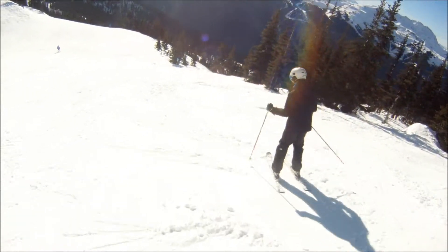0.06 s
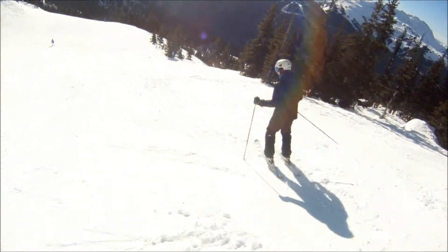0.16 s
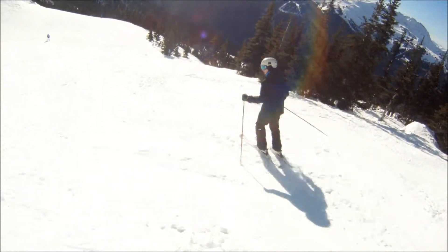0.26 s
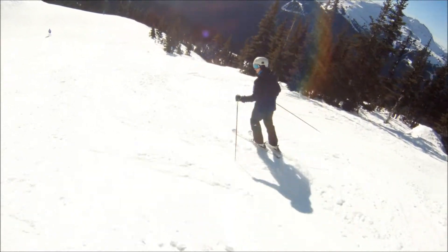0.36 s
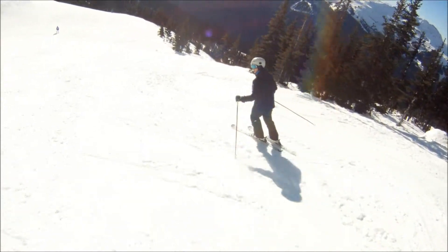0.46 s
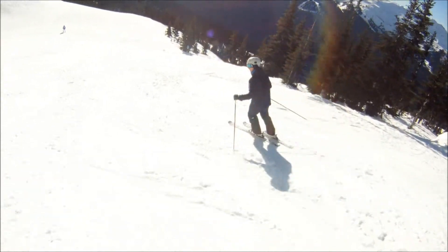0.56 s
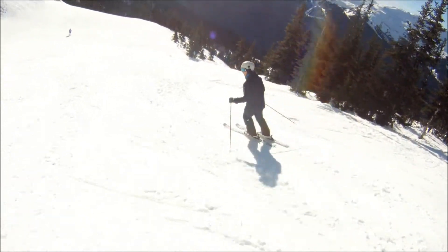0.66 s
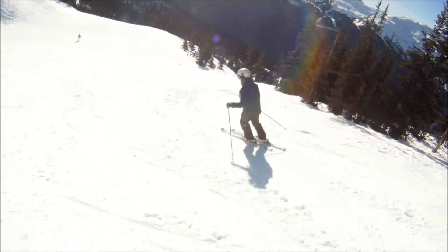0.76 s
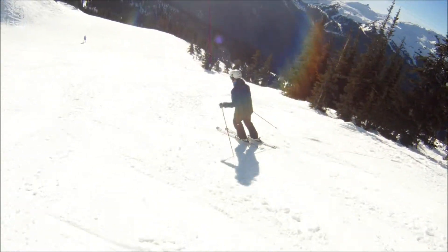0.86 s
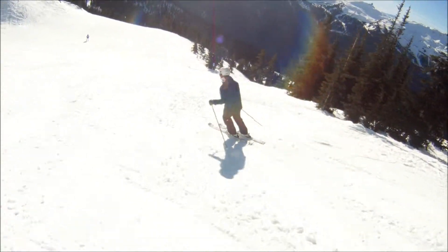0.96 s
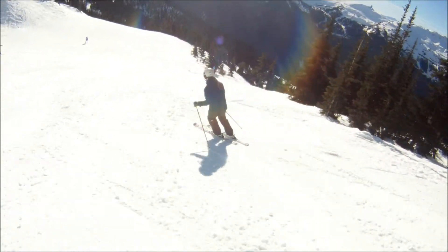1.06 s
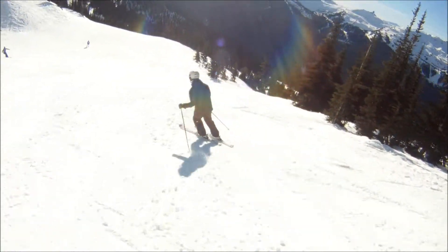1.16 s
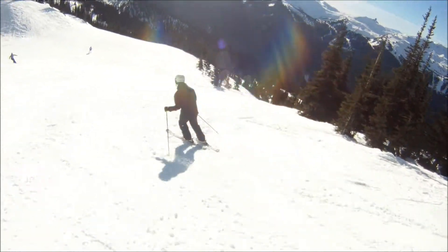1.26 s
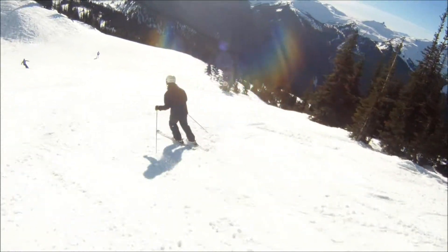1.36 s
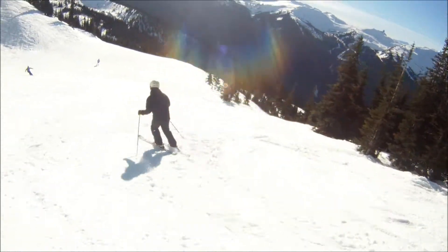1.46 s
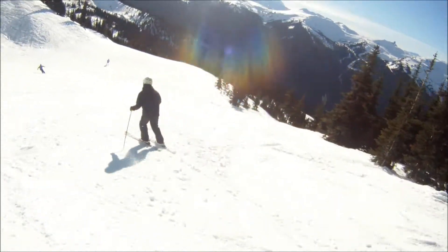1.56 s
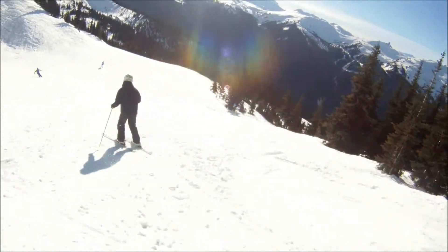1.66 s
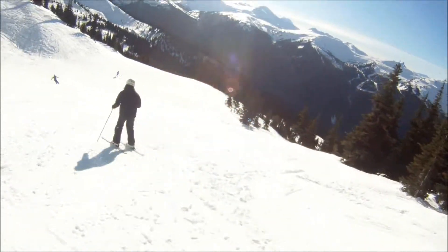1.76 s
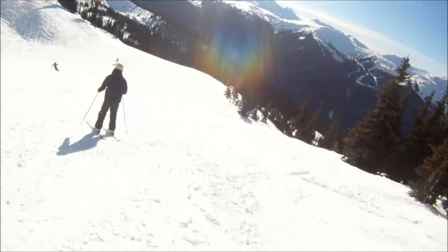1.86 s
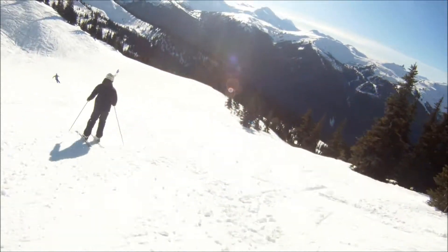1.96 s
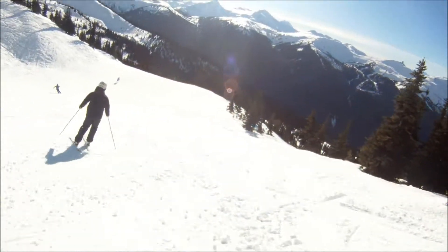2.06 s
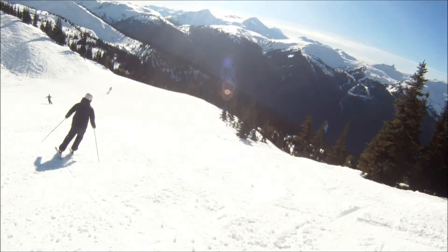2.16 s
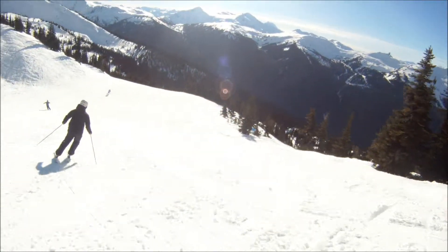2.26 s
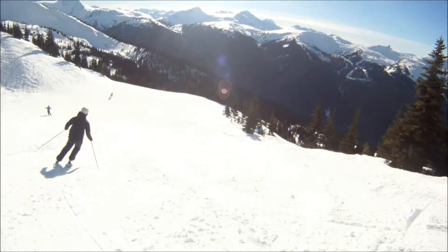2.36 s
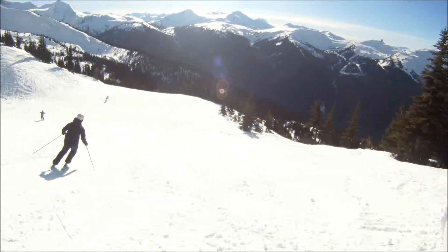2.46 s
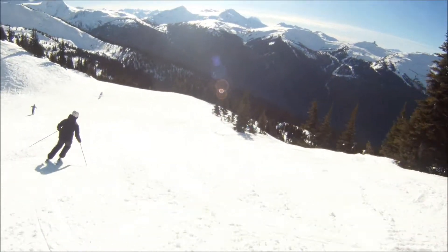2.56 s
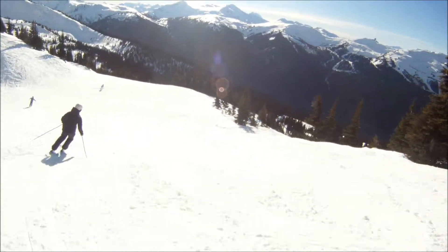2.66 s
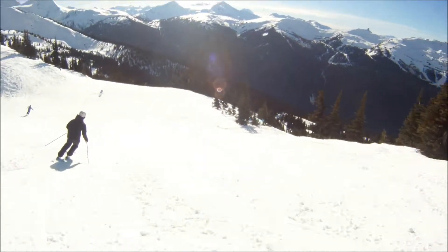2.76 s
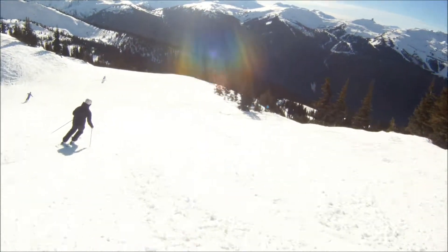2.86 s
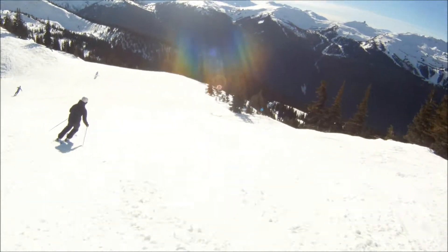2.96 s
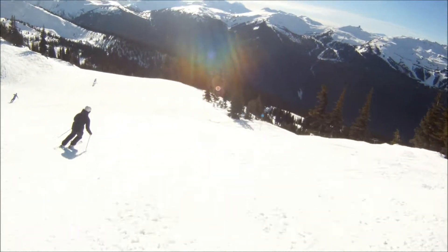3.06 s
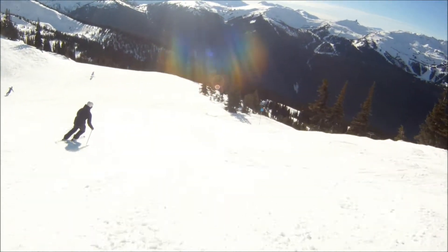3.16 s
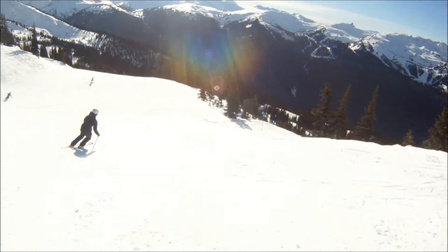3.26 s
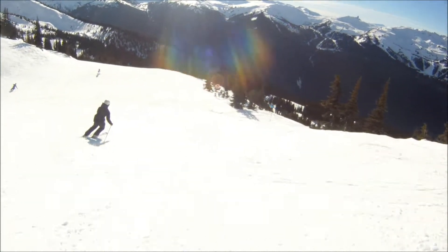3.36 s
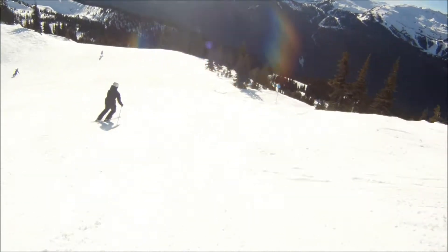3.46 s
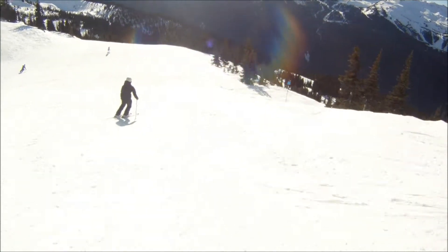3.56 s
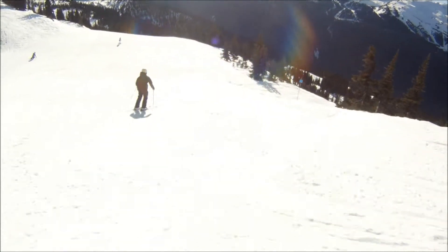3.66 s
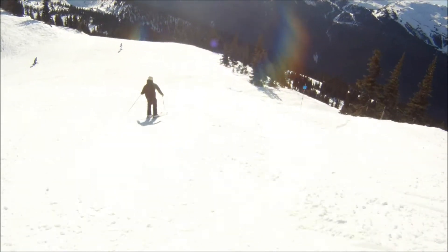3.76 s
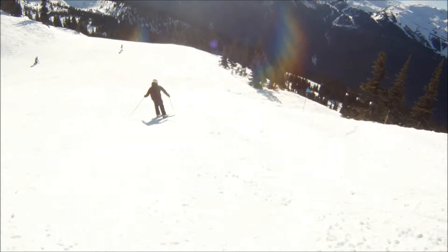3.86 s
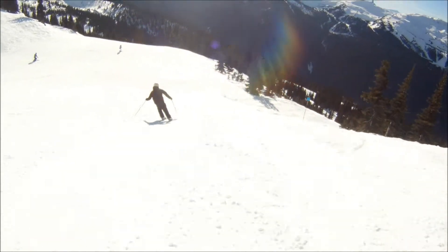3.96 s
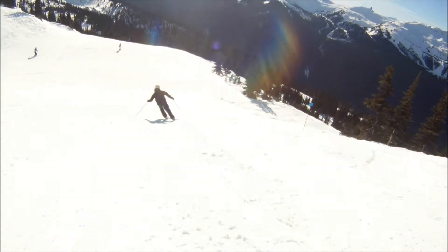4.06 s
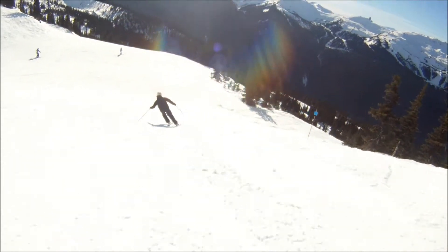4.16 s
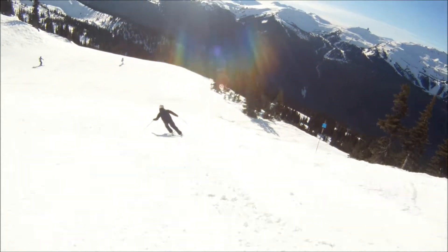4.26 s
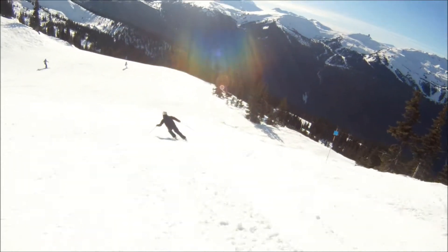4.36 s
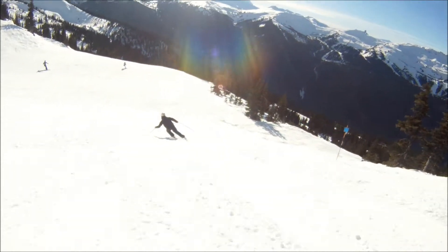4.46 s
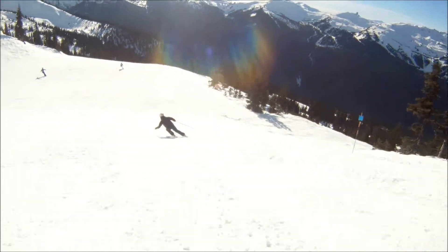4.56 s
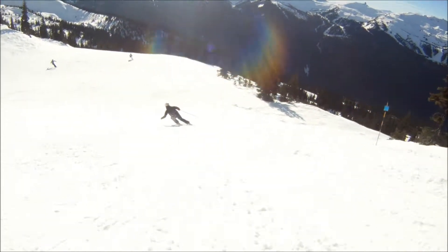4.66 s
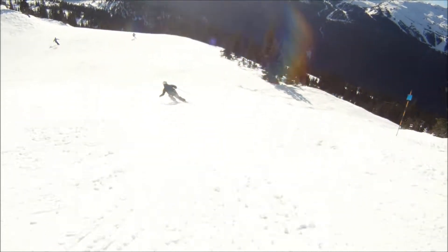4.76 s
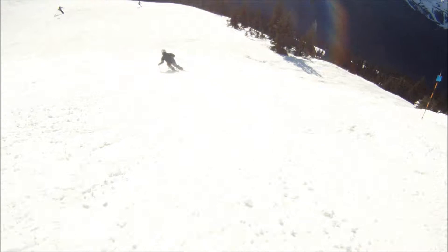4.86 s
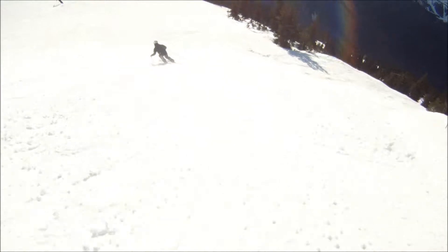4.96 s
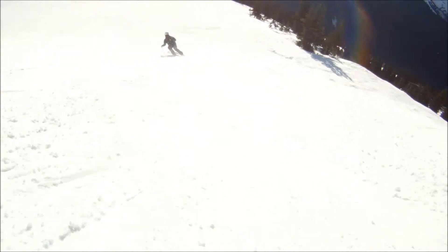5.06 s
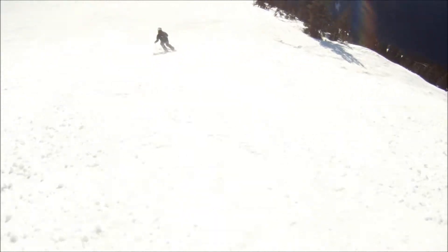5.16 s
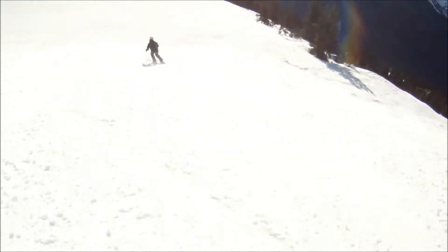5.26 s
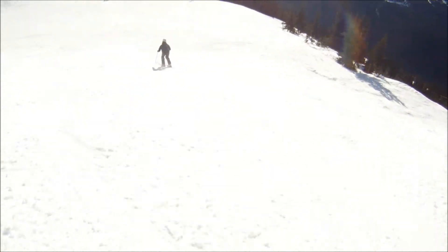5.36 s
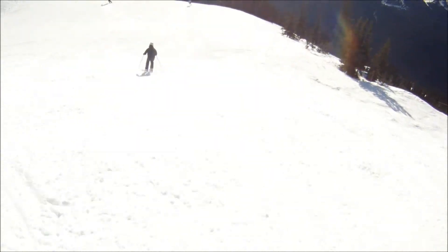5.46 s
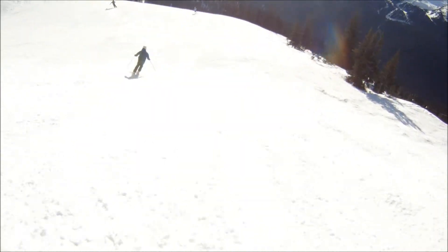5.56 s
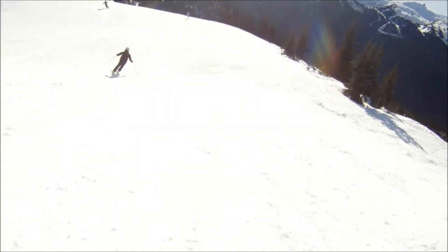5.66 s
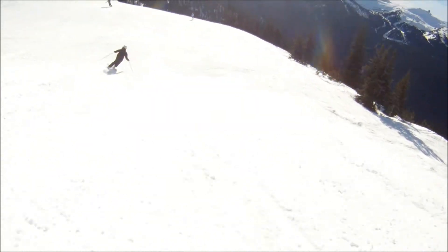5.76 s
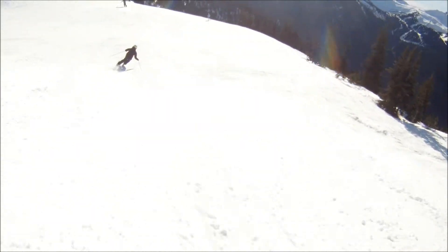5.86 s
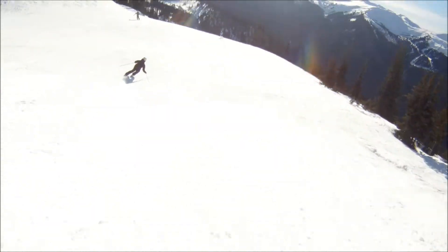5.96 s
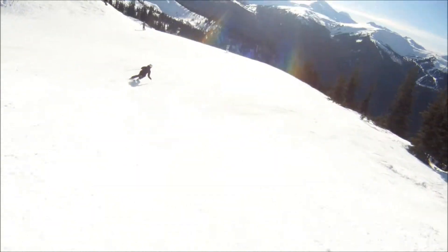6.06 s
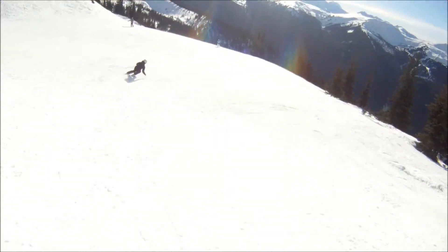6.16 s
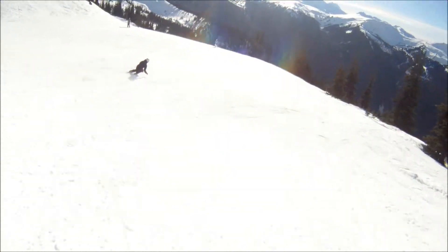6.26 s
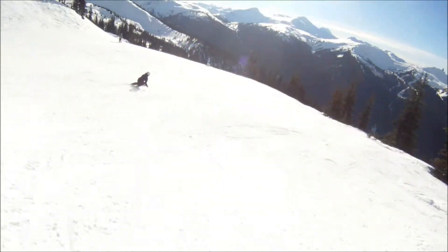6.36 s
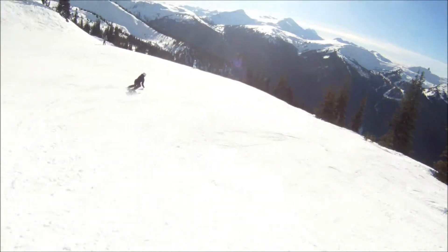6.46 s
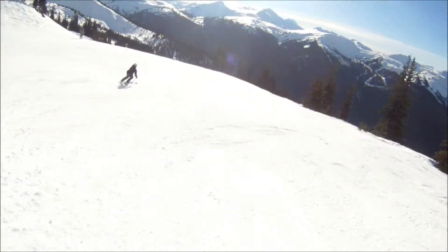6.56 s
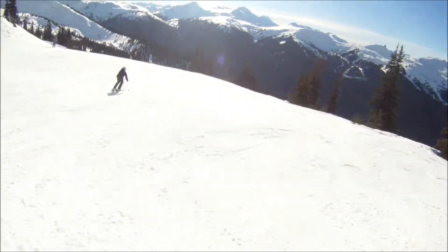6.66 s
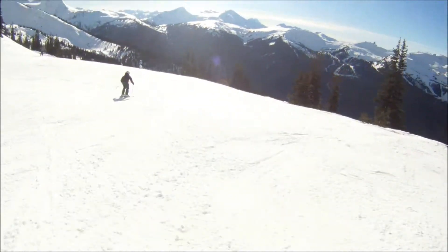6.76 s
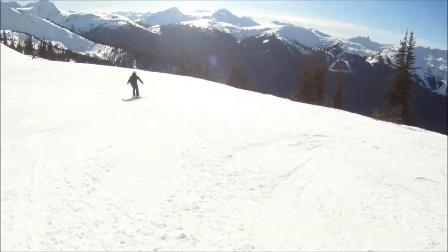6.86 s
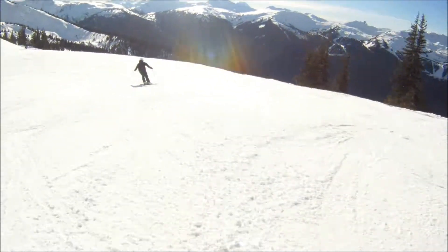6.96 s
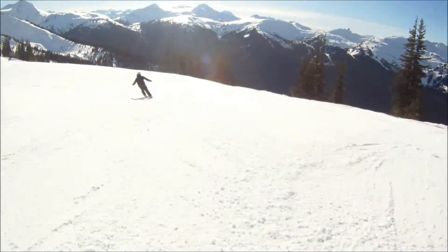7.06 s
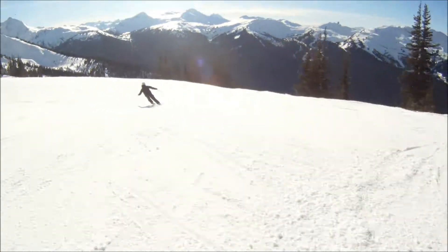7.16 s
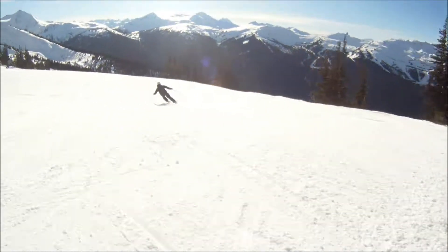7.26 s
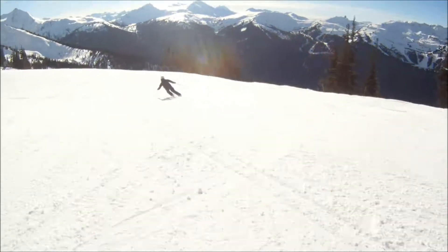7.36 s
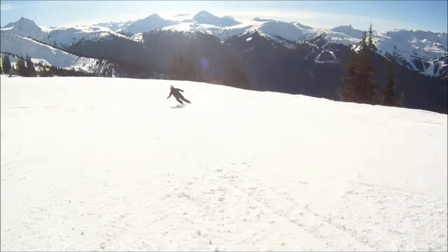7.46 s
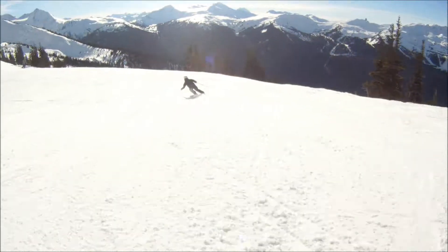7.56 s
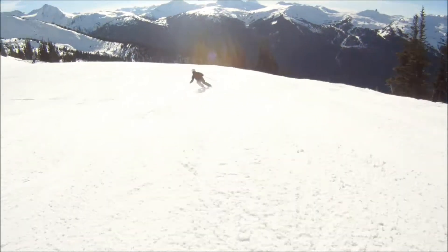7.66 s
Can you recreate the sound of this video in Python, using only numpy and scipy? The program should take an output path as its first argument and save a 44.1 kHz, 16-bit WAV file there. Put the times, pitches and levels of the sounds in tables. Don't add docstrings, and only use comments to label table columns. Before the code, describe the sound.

Close, boxy, slightly lo-fi sound of skis sliding on hard snow outdoors. The soft hiss grows over several seconds into a broad, steady rush, briefly dipping on bumps. Low wind flutter and rumble press on the microphone throughout. Early on come small plastic creaks, crunches and grit ticks; later a cluster of deep gust thumps and hard mount knocks, then fast gliding with no ending.

```python
import sys
import numpy as np
from scipy import signal
from scipy.fft import rfft, irfft
from scipy.io import wavfile
from scipy.ndimage import uniform_filter1d

SR = 44100
rng = np.random.default_rng(int(sys.argv[2]) if len(sys.argv) > 2 else 0)


def pcm_store(signal):
    levels = np.round(np.clip(np.atleast_2d(signal), -1, 1) * 32767)
    wavfile.write(sys.argv[1], SR, levels.astype(np.int16).T)


def boost(x):
    u = np.asarray(x, float) / 20
    return 10 ** u


N = 339570


def seconds():
    return np.arange(N) / SR


def in_time(rows):
    s, *columns = np.transpose(rows)
    return [np.interp(seconds(), s, column) for column in columns]


def swells(rows):
    t = seconds()
    return sum(size * np.cos(np.pi * np.clip((t - s) / length, -.5, .5)) ** 2 for s, size, length in rows)


def rms_one(x):
    return x / np.sqrt(np.mean(x ** 2) + 1e-20)


def log_hz():
    return np.log(np.arange(1, N // 2 + 2) * SR / N)


def coloured(x, points):
    hz, db = np.transpose(points)
    return rfft(x) * boost(np.interp(log_hz(), np.log(hz), db, left=-120, right=-120))


def coloured_noise(points):
    return coloured(rng.standard_normal(N), points)


def drift(rate):
    pole = np.exp(-40 * np.pi * rate / SR)
    noise = rng.standard_normal(N // 20 + 3002)
    slow = signal.lfilter([1], [1, -2 * pole, pole * pole], noise)[3000:]
    return np.interp(np.arange(N) / 20, np.arange(len(slow)), rms_one(slow))


def clicks(times, db):
    out = np.full(N, 1e-18)
    out[np.round(np.asarray(times) * SR).astype(int)] = boost(db)
    return out


def struck(x, modes):
    out = 0
    for hz, db, t60 in modes:
        r = boost(-60 / (t60 * SR))
        w = 2 * np.pi * hz / SR
        out = out + signal.lfilter([0, boost(db) * np.sin(w)], [1, -2 * r * np.cos(w), r * r], x)
    return out


# f/Hz, width/Hz, lift
# or dip/dB
SHELL_RESONANCES = [(240.6, 22, 6), (760, 53, 5), (953, 300, 3.5), (1650, 200, 1.5), (2260, 140, 2.5),
                    (2610, 95, 3.5), (3050, 75, 0), (3244, 107, 5), (3530, 160, 3), (3880, 200, 1),
                    (4100, 170, 4.5), (4790, 310, 7), (5950, 220, -8.5)]


def housing(spectrum):
    hz = np.exp(log_hz())
    lift_db = sum(db / (1 + (2 * (hz - centre) / width) ** 2) for centre, width, db in SHELL_RESONANCES)
    return spectrum * boost(lift_db)


# f/Hz, level/dB per Hz
SLOPE_COLOUR = [(180, -40), (300, -5.5), (627, -5), (776, -7.5), (1170, -26), (1360, -9), (1880, -8),
                (2610, -11.5), (3180, -15), (4140, -12.5), (4630, -23), (5450, -15), (5950, -26),
                (7740, -66), (13100, -120)]


def slope():
    return boost(-59) * rms_one(irfft(housing(coloured_noise(SLOPE_COLOUR)), N))


# f/Hz, level/dB per Hz
RUMBLE_COLOUR = [(8.8, -14), (15, -0.5), (27, 3), (43, 2.5), (53, -3.5), (75, -27), (90, -19), (120, -64),
                 (200, -120)]
# f/Hz, level/dB per Hz
FLUTTER_COLOUR = [(35, -41), (60, -6), (75, -2.5), (112, -3), (199, -5.5), (237, -6.5), (285, -9),
                  (450, -12.5), (580, -15), (990, -120)]
# t/s, rumble level/dB, length/s
GUST_SWELLS = [(0.02, -47, 0.14), (0.218, -33.5, 0.11), (0.404, -44, 0.048), (.63, -45, 0.41),
               (0.876, -44, .09), (1.0, -37, 0.056), (1.15, -37.5, 0.18), (1.43, -37, .3),
               (1.68, -38, 0.28), (1.847, -38, 0.25), (2.007, -36, 0.23), (2.306, -45, 0.54),
               (2.505, -40, 0.087), (2.846, -35.5, 0.74), (3.244, -37, .12), (3.42, -38, 0.27),
               (4.01, -44, 0.73), (4.296, -38, 0.3), (4.65, -43, .1), (4.924, -36.5, 0.28),
               (5.434, -41, 0.28), (5.69, -34.5, 0.44), (5.937, -29, 0.38), (6.093, -26, 0.055),
               (6.235, -26.5, 0.23), (6.548, -41.5, 0.65), (6.79, -39, 0.22), (6.95, -42, 0.16),
               (7.194, -33.5, 0.71), (7.514, -37, 0.32)]
# t/s, level/dB
HEADWIND_CURVE = [
    (0.0, 2),
    (0.9, 0.5),
    (1.7, 1),
    (2.6, -1),
    (4.0, -2),
    (5.1, 1.5),
    (5.5, -1.5),
    (6.6, -0.5),
    (7.0, 1.5),
    (7.7, 3.5),
]


def wind(rumble_lump_db, flutter_lump_db, calm):
    lull_db = -47.5
    gust = boost(lull_db) + swells([(s, boost(db), length) for s, db, length in GUST_SWELLS])
    gust_db = 20 * np.log10(gust)
    speed_db = in_time(GLIDE_CURVE)[0]
    flutter_db = -48 + 0.63 * (speed_db - speed_db.mean()) + 0.19 * (gust_db - gust_db.mean())
    flutter_db = flutter_db + in_time(HEADWIND_CURVE)[0]
    rumble = irfft(coloured_noise(RUMBLE_COLOUR), N)
    chance_swell = np.sqrt(uniform_filter1d(rumble ** 2, size=4000))
    rumble = rumble / chance_swell ** 0.41
    rumble = rumble * boost(rumble_lump_db * drift(11))
    flutter = irfft(housing(coloured_noise(FLUTTER_COLOUR)), N) * boost(flutter_lump_db * drift(22))
    return gust * rms_one(rumble) * calm + boost(flutter_db) * rms_one(flutter)


# t/s, peak level/dB, f/Hz
BUFFET_EVENTS = [(0.219, -35, 31.2), (0.588, -28, 35), (0.695, -34.6, 33.4), (1.137, -30.5, 35.5),
                 (1.316, -31, 42.3), (1.398, -22.5, 41), (1.448, -19.5, 39.5), (1.495, -32, 34.4),
                 (1.655, -18.5, 36.2), (1.963, -27, 43), (2.017, -27, 42), (2.489, -30, 42),
                 (2.733, -34, 34.6), (2.771, -33, 31.8), (2.846, -21, 38), (5.694, -21, 31.8),
                 (5.838, -24, 43.4), (5.923, -10, 41), (5.971, -19, 36), (6.234, -13.5, 41.4)]


def buffets(turns, lift_db, sweep_db):
    out, busy, t = np.zeros(N), np.zeros(N), seconds()
    for s, db, hz in BUFFET_EVENTS:
        cycles = np.clip((t - s) * hz + .25, 0, turns)
        window = np.sin(np.pi * (cycles / turns) ** 0.91)
        out -= boost(db + lift_db) * np.sin(2 * np.pi * (cycles - .25)) * window
        busy = np.maximum(busy, window)
    calm = boost(-sweep_db * np.sqrt(np.abs(busy)))
    return out, calm


# t/s, thud peak level/dB, tick level over the thud/dB
KNOCK_EVENTS = [(1.333, -37, -6), (1.436, -46, -18), (1.592, -41, -17), (1.733, -32, -20),
                (1.992, -46, -15), (2.363, -25.5, -12), (2.602, -38, -16), (2.782, -32.5, -10),
                (5.236, -43, 9), (5.467, -34, -20), (5.8258, -20, 4), (5.915, -19.5, 2), (5.98, -45, -8),
                (6.173, -33.5, 2), (6.658, -34.5, -5)]
# f/Hz, level/dB, t60/s
MOUNT_MODES = [
    (105, 5, 0.029),
    (230, 1.5, 0.072),
]
# f/Hz, level/dB, t60/s
SHELL_MODES = [
    (866, 8, 0.023),
    (1130, -7, 0.012),
]


def knocks(soft_hz):
    s, thud_db, tick_db = np.transpose(KNOCK_EVENTS)
    blow_s = s + 0.00467
    thuds = struck(clicks(blow_s, thud_db - 2.5), MOUNT_MODES)
    ticks = struck(clicks(blow_s, thud_db + tick_db), SHELL_MODES)
    return -signal.sosfilt(signal.butter(4, soft_hz, fs=SR, output="sos"), thuds + ticks)


# t/s, f/Hz, peak level/dB, length/s
CREAK_EVENTS = [
    (.165, 4900, -58, 0.014),
    (.19, 2550, -50, 0.014),
    (.405, 766, -44.5, .035),
    (0.725, 760, -44, 0.033),
    (0.773, 3560, -52, 0.014),
    (.775, 3080, -72, .02),
    (1.864, 2450, -36, 0.024),
    (2.233, 1670, -35, 0.019),
]


def creaks(glide):
    out, t = np.zeros(N), seconds()
    for s, hz, db, length in CREAK_EVENTS:
        gone = np.clip((t - s) / length, 0, 1)
        cycles = hz * length * (gone + glide * gone ** 2)
        out += boost(db) * np.sin(np.pi * gone) * np.sin(2 * np.pi * cycles)
    return out


# t/s, peak level/dB
SPIT_EVENTS = [
    (0.0827, -54),
    (0.167, -52),
    (0.7774, -58),
    (1.4551, -43),
    (1.4734, -50),
    (1.6714, -47),
    (1.6964, -49),
    (1.723, -45),
    (1.8374, -43),
    (1.9674, -48),
]


def spits():
    s, db = np.transpose(SPIT_EVENTS)
    t60_s, low_hz, lift_db = 0.04, 3700, 2
    shape = signal.lfilter([1], [1, -boost(-60 / (t60_s * SR))], clicks(s, db + lift_db))
    high_pass = signal.butter(4, low_hz, "high", fs=SR, output="sos")
    return shape * rms_one(signal.sosfilt(high_pass, rng.standard_normal(N)))


# t/s, peak level/dB, t60/s
CRUNCH_EVENTS = [(0.0827, -53, 0.072), (0.167, -53, 0.048), (0.7791, -49, 0.08), (1.1418, -50, 0.089),
                 (1.4596, -40, 0.088), (1.5299, -48, 0.088), (1.596, -41, 0.088), (1.637, -39, 0.062),
                 (1.6706, -45, 0.2), (1.723, -48, 0.088), (1.8941, -56, 0.066), (2.1784, -46, 0.08),
                 (2.2268, -42, 0.14), (2.7781, -38, 0.092), (3.736, -41, 0.074), (6.118, -34, 0.06),
                 (7.1397, -36, 0.11)]
# f/Hz, level/dB per Hz
CRUST_COLOUR = [(240, -39), (400, -5), (745, 4), (1270, -9), (1600, 2), (1990, 2), (2280, 1.5), (3540, -1),
                (5950, -23), (7740, -57), (13100, -120)]


def crunches(lift_db, rise_s):
    s, db, t60 = np.transpose(CRUNCH_EVENTS)[:, :, None]
    age = np.maximum(seconds()[None, ::20] - s, 0)
    decay = boost(db - 60 * age / np.maximum(t60, .01))
    shape = decay * (1 - np.exp(-age / rise_s))
    noise = rms_one(irfft(coloured_noise(CRUST_COLOUR), N))
    return boost(lift_db) * np.repeat(shape.sum(axis=0), 20)[:N] * noise


# t/s, hiss level/dB, flatness as low roar/dB
GLIDE_CURVE = [(0.0, -58.5, -3), (0.3, -58, 3.5), (0.9, -54.5, 5.5), (1.4, -45, 0), (1.95, -42, 1.5),
               (2.6, -40, 1), (2.95, -39, 1), (3.4, -35.5, 0.5), (3.95, -33.5, 0.5), (4.55, -33, 0),
               (5.05, -33.5, 2.5), (5.35, -30, 0), (5.9, -29, 0), (6.4, -29.5, -0.5), (6.7, -27.5, -1),
               (7.2, -27, -1), (7.45, -29, 1.5), (7.7, -27, 1)]
# t/s, hiss lost/dB, length/s
BUMP_LIFTS = [
    (1.55, 3, 0.099),
    (1.76, 2.5, .06),
    (3.56, 3.5, 0.6),
    (5.138, 7, 0.057),
    (5.19, 4, 0.19),
    (6.63, 0, 0.065),
]
# f/Hz, level/dB per Hz
SNOW_COLOUR = [(180, -42), (300, -17), (442, -17), (560, -9), (766, -2.5), (1050, -4.5), (1230, -9),
               (1430, -3.5), (1770, -7), (2030, -2.5), (3180, -4), (3790, -13), (4410, -19.5),
               (4870, -19.5), (5950, -16), (7740, -62), (13100, -120)]
TILT_HZ = [2600, 850, 1500, 4500]
TILT_PER_FLAT = [1.22, 0.49, 0.086]
TILT_PER_SPEED = [0.0092, 0.011, 0.19]
TILT_PER_LIFT = [-.3, -0.46, 0.2]


def skis(grain_db, patchy_db, judder_db, count):
    speed_db, flat_db = in_time(GLIDE_CURVE)
    lift_db = swells(BUMP_LIFTS)
    body_db = speed_db - lift_db
    tilts_db = [np.zeros(N)]
    for per_flat, per_speed, per_lift in zip(TILT_PER_FLAT, TILT_PER_SPEED, TILT_PER_LIFT):
        tilts_db.append(per_flat * flat_db + per_speed * (speed_db - speed_db.max()) - per_lift * lift_db)
    tilts_db = np.array(tilts_db)

    crystals = rng.standard_normal(N) * boost(grain_db * drift(210))
    spectrum = housing(coloured(crystals, SNOW_COLOUR))
    body = np.abs(log_hz() - np.log(2560)) < .3
    spectrum = spectrum / np.std(irfft(spectrum * body, N))

    centres = np.linspace(np.log(300), np.log(5950), count)
    judder = 1.5 * drift(4) + .8 * drift(18) + .7 * drift(45)
    out = np.zeros(N)
    for k, centre in enumerate(centres):
        band = irfft(spectrum * np.interp(log_hz(), centres, np.arange(count) == k), N)
        shares = [np.interp(centre, np.log(sorted(TILT_HZ)), np.sort(TILT_HZ) == hz) for hz in TILT_HZ]
        shake_db = judder_db * judder * (k / count) ** 1.1
        out += band * boost(shares @ tilts_db + patchy_db * drift(9.6) + shake_db)
    return boost(body_db) * out


def scene():
    pushes, calm = buffets(turns=1.9, lift_db=-3.0, sweep_db=1.5)
    air = wind(rumble_lump_db=1.5, flutter_lump_db=0.5, calm=calm) + pushes
    shell = knocks(soft_hz=1500) + creaks(glide=0.011) + spits()
    snow = slope() + crunches(lift_db=7.0, rise_s=0.0033)
    snow = snow + skis(grain_db=0.31, patchy_db=1.03, judder_db=0.34, count=16)
    return (air + shell + snow)[None]


def roll_off(x):
    return signal.sosfilt(signal.butter(12, 15330, fs=SR, output="sos"), x)


def record(dry):
    sample_hz, hold = 12000, 4
    coarse = signal.resample_poly(dry, sample_hz, SR, axis=1)
    stairs = np.repeat(coarse, hold, axis=1)
    held = signal.resample_poly(stairs, SR, sample_hz * hold, axis=1)[:, :N]
    mix = held + boost(-78) * rng.standard_normal(N)
    return roll_off(mix)


dry = scene()
out = record(dry)
pcm_store(out)
```